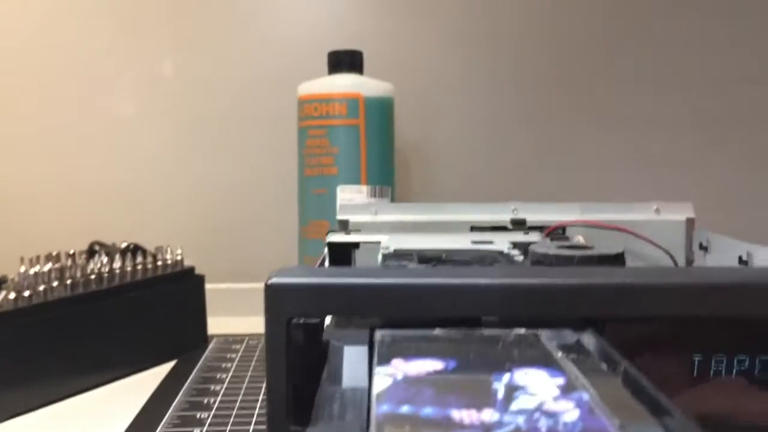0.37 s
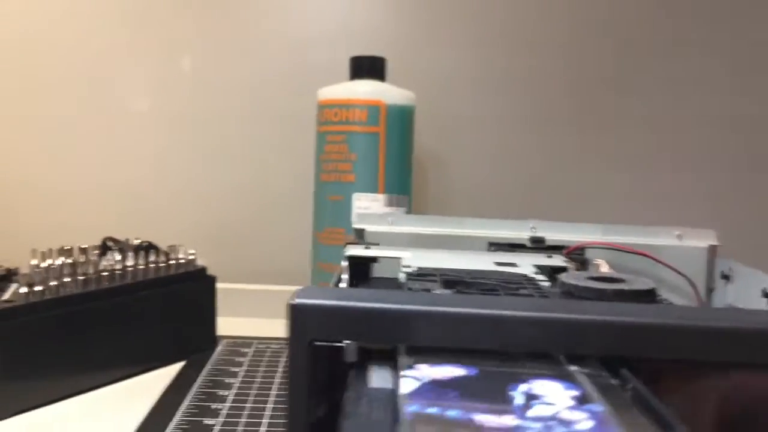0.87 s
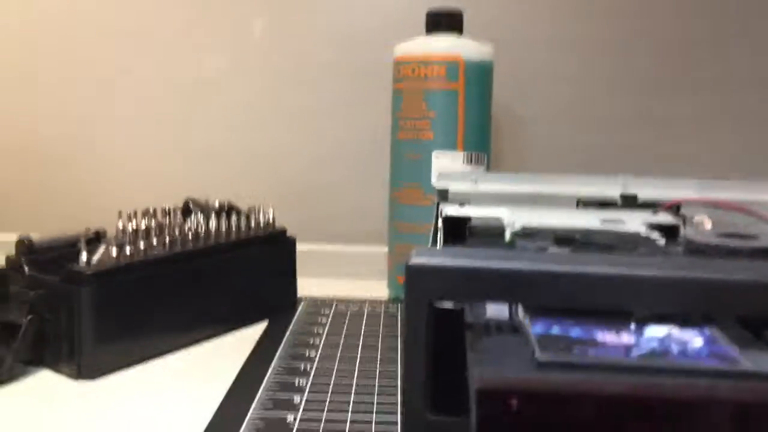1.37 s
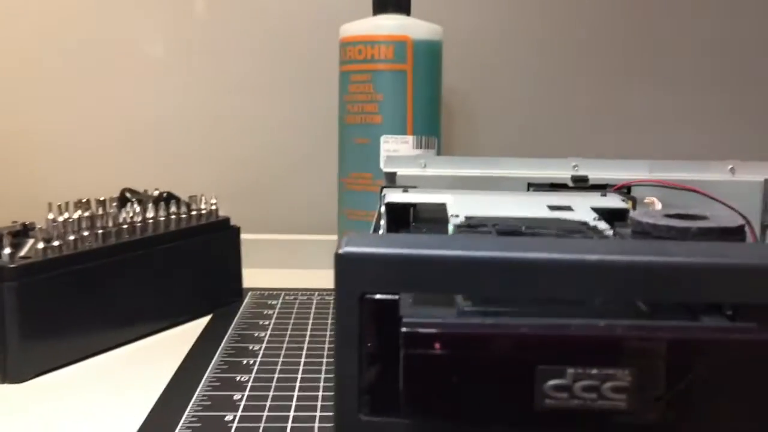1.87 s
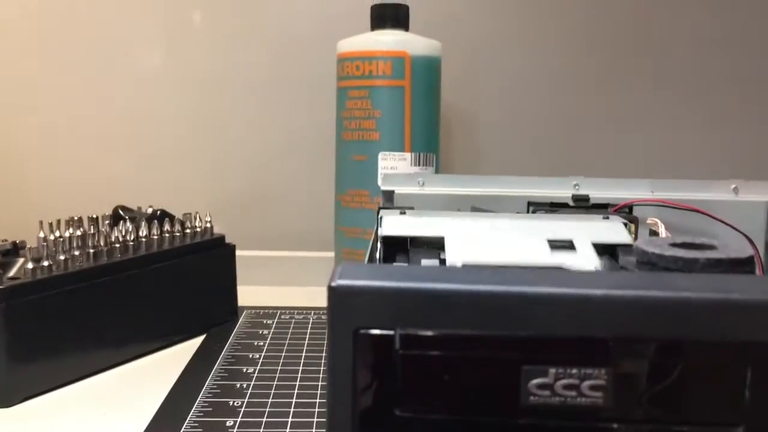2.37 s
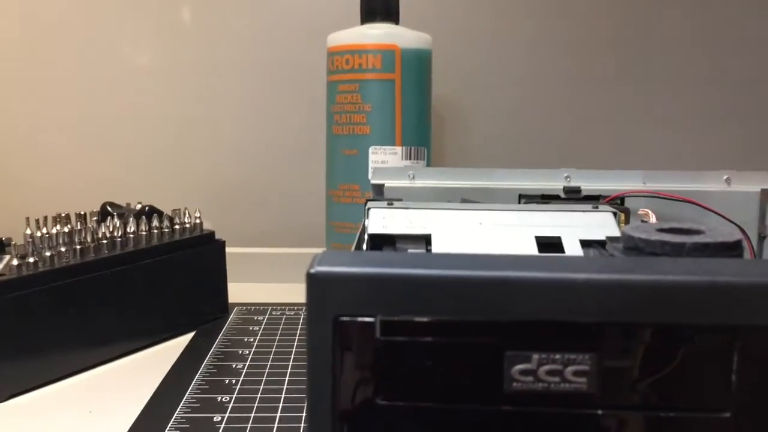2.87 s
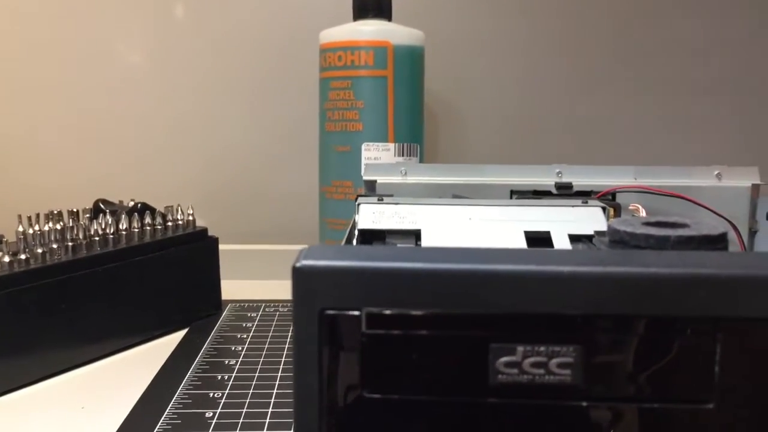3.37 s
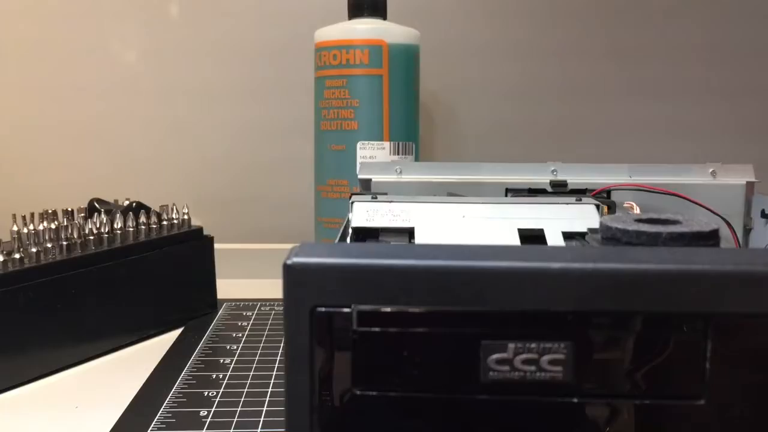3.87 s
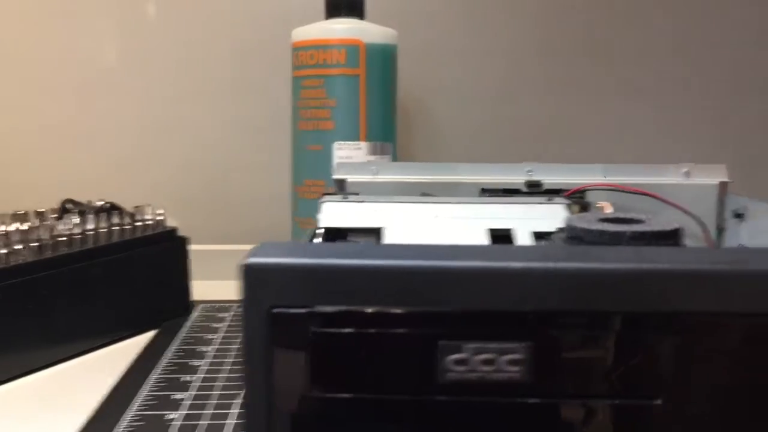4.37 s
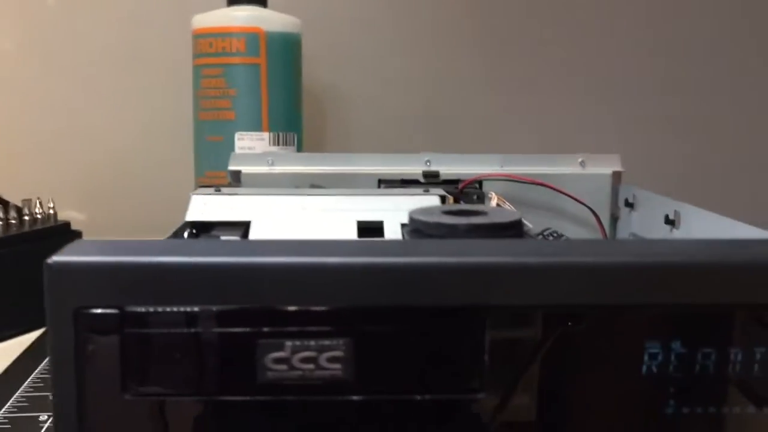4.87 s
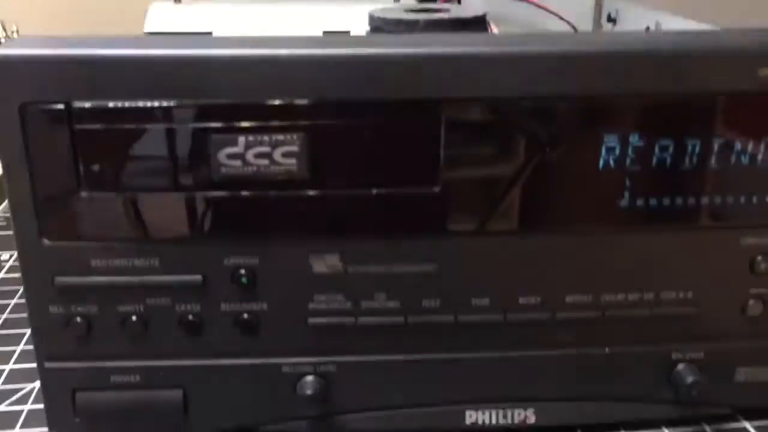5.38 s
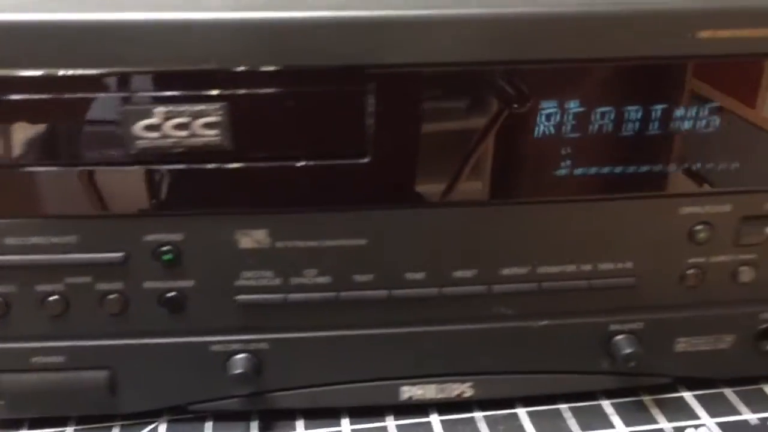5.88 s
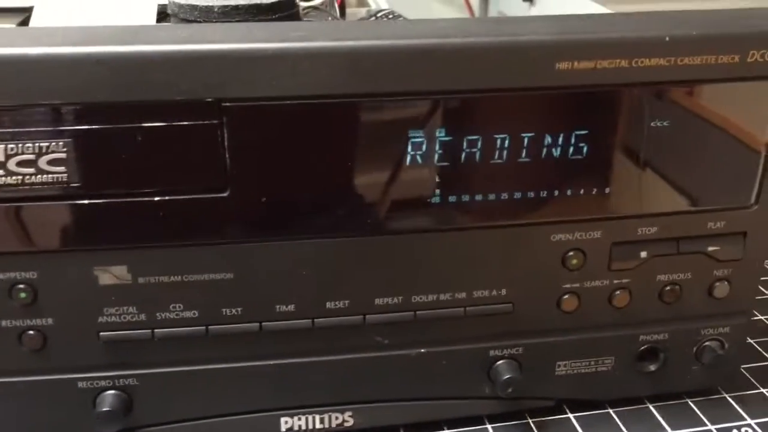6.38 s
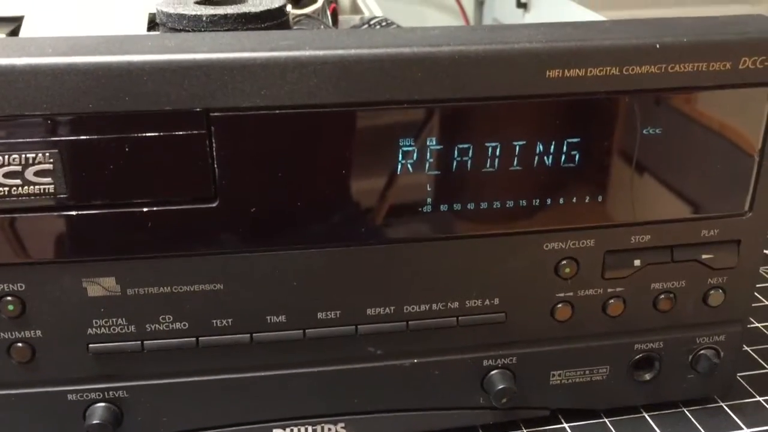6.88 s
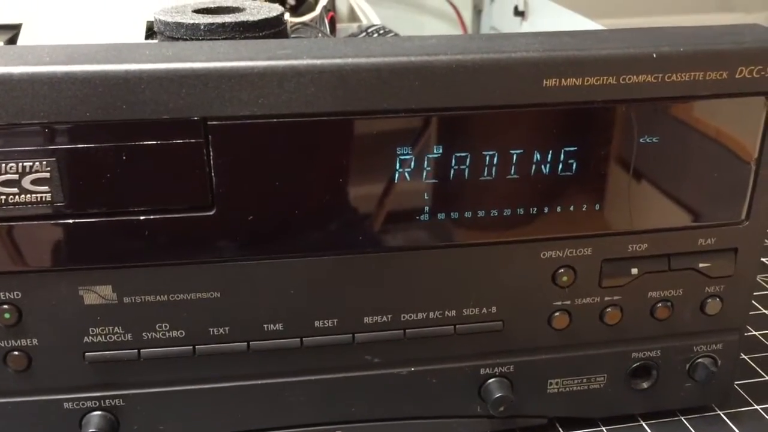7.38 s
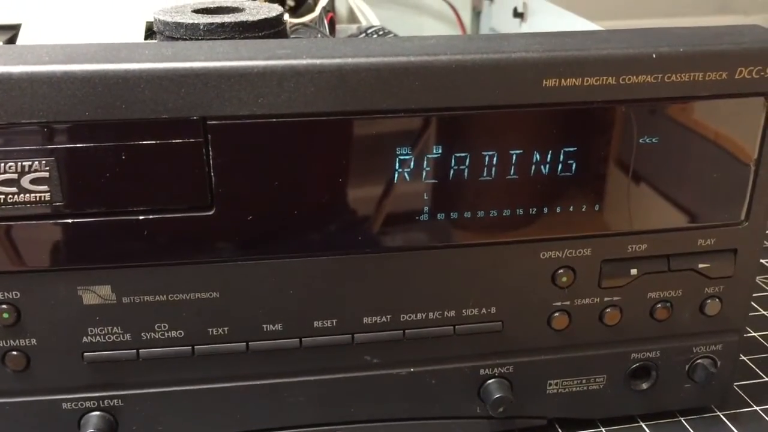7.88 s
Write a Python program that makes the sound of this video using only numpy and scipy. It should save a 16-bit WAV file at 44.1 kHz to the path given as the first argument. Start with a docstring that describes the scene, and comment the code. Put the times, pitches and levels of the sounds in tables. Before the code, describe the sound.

In a quiet room with a low hum, a handheld microphone close to an open cassette deck catches the tray rattling and scraping shut, ending in two hard clunks. A small gear ticks to rest and a light click follows. After a pause, levers clack sharply with gritty gear grinding and a faint motor whine. Another quiet gap, then louder metallic clacks.

```python
"""A quiet room: on a desk stands a cassette deck with its lid off, heard by a hand-held microphone close by.
The tray slides shut and clamps the cassette, as gritty noise through ringing rails; a gear ticks to rest.
Then solenoids and cam levers clack in bursts, as short noise bursts that ring the metal and boom in the case.
The cam gear grinds in between, the motor whines faintly as a stack of tones, and the building hums low.
Small touches: a brush of treble, a shudder as the motor takes up its belt, squeaks before four blows."""
import sys
import numpy as np
from scipy import signal
from scipy.fft import rfft, irfft, next_fast_len
from scipy.io import wavfile
from scipy.ndimage import map_coordinates

SR = 44100
rng = np.random.default_rng(int(sys.argv[2]) if len(sys.argv) > 2 else 0)


def invert_db(level):
    """Linear amplitude ratio for a level in decibels (20 dB per decade), elementwise."""
    return 10 ** (np.asarray(level, dtype=float) / 20)


def waveform_to_disk(signal):
    """Save audio, clipped to [-1, 1], as 16-bit WAV at the path in sys.argv[1]."""
    frames = np.transpose(np.atleast_2d(signal))
    scaled = np.clip(frames, -1, 1) * 32767
    samples = np.round(scaled).astype(np.int16)
    wavfile.write(sys.argv[1], SR, samples)


N = 363384
TIME = np.arange(N) / SR  # seconds

# room modes that color the hum: (center [Hz], width [Hz], level [dB])
ROOM_MODES = [(116.5, 2.9, -6), (129.1, 4.2, -3), (144.3, 6, -5), (172, 20.8, -4), (192.7, 4.8, 2)]
# slow wavering of the hum: (time [s], level [dB])
HUM_LEVEL = [(0, -61.5), (1.2, -61.5), (1.7, -66.5), (2.5, -62), (5.3, -62.5), (6.1, -67.5), (7.4, -61.5),
             (8.24, -60.5)]
# tones in the hum: (pitch [Hz], peak level over the hum's rms [dB])
HUM_TONES = [(119.8, -4.5), (193, -5.5)]
# tone color of the deep rumble: (frequency [Hz], relative level per Hz [dB])
RUMBLE_COLOR = [(13, -74), (22, -42.5), (35, -24.5), (43, -15.5), (86, -14), (110, -6), (140, -33.5),
                (240, -120)]
# moments when the deep rumble swells: (time [s], peak level [dB])
RUMBLE_SWELLS = [(0.64, -61.5), (1.36, -60.5), (1.55, -58.5), (1.97, -58.5), (2.22, -58), (2.59, -55),
                 (5.28, -67), (7.14, -56.5)]
# tone color of air and preamplifier hiss: (frequency [Hz], relative level per Hz [dB])
HISS_COLOR = [(120, -28.5), (205, -4.5), (221, -11), (246, -15.5), (323, -21), (466, -29), (3400, -34),
              (4980, -36.5), (8770, -39), (10500, -41.5), (13100, -39), (14900, -40), (16000, -47)]
# capstan motor tones: (multiple of the shaft rate [-], level before the running curve [dB])
MOTOR_TONES = [(4, -89), (16 / 3, -97), (8, -91), (11, -91), (12, -97), (13, -95), (14, -100), (17, -100),
               (19, -97), (20, -101), (21, -88), (64 / 3, -93), (22, -98), (32, -101), (34, -100),
               (104, -104), (111.2, -101)]
# how the motor runs: (time [s], level change [dB], extra level near the 1 kHz chassis mode [dB])
MOTOR_RUN = [(0, -32.5, 0), (4.5, -18, -5), (4.7, 20, 3), (5.6, 0, -3), (6.3, 0, 1), (7, 2, 2),
             (7.3, -2.5, 9), (8.04, 3.5, 1), (8.1, 7, 10), (8.24, 20, 6)]
# brief soft brush of treble: (start [s], end [s], level [dB])
SWISH_SPAN = (0.055, 0.13, -70.5)
# the motor takes up its belt: (start [s], end [s], level [dB])
SPIN_UP_SPAN = (4.44, 4.46, -72.5)
# motor bracket resonances: (center [Hz], width [Hz], level [dB])
BRACKET_MODES = [(990, 24, 2.5), (1200, 14.7, 1), (1910, 76, -6.5), (3244, 73, -9.5)]
# tray sliding: (time [s], friction [dB], dryness [dB]: positive scrapes, negative rumbles)
TRAY_MOTION = [(0.0, -80, -17), (0.16, -73, -11), (0.31, -72, -23), (0.45, -73.5, -13), (0.56, -67.5, 2),
               (0.71, -55, -4), (0.9, -63.5, -2.5), (1.13, -60, -8), (1.32, -68, 1.5), (1.5, -68.5, 7),
               (1.86, -75, 4.5), (1.96, -65, 16), (2.07, -56, -4), (2.15, -69.5, 4), (2.3, -62.5, -6),
               (2.41, -56.5, -5), (2.55, -54, 6), (2.66, -71, -9), (2.8, -88, 7)]
# resonances of tray and rails: (center [Hz], width [Hz], level [dB])
RAIL_MODES = [(472, 21, -11), (743, 26, -2.5), (932, 42, -6), (1076, 58, -5), (1430, 140, -6),
              (1680, 120, -3), (2210, 120, -11), (2660, 90, -6), (3310, 350, -10.5), (3970, 160, -1.5),
              (4400, 150, -15.5), (12330, 250, -29)]
# rumble, drag, scrape and hiss of the tray: (level over friction [dB], gain per dB of dryness [dB])
SLIDE_LAYERS = [(-6.5, -0.37), (-1, 0), (-6.5, .9), (-17, 1.1)]
# the two turns of the cam gear, each a list of: (time [s], relative level [dB])
CAM_TURNS = [
    [(4.62, -86), (4.752, -51), (4.812, -65), (4.954, -61), (5.068, -70), (5.202, -66.5), (5.348, -85),
     (5.486, -51), (5.62, -105)],
    [(7.55, -84), (7.662, -56), (7.778, -70), (7.804, -47.5), (7.926, -60), (8.24, -104)],
]
# a gear coasting to rest: (time [s], level before the tooth filter [dB])
GEAR_TICKS = [(2.778, -71), (2.834, -74.5), (2.8858, -72.5), (2.9692, -70.5), (3.052, -72.5), (3.1253, -72),
              (3.1906, -68.5), (3.2635, -71), (3.3533, -71), (3.466, -71)]
# a plunger slides before it lands: (start [s], end [s], peak level [dB])
PLUNGER_SQUEAKS = [(4.567, 4.592, -48), (4.923, 4.936, -52), (7.013, 7.032, -54), (7.602, 7.626, -47)]
# the case booms: (time [s], peak level [dB], pitch [Hz], nominal time to fall 60 dB [s])
CASE_THUMPS = [(0.14, -51.5, 440, 0.16), (0.465, -50, 480, 0.17), (0.547, -40.5, 470, 0.029),
               (0.614, -43, 740, 0.092), (1.097, -49, 473, 0.14), (1.15, -48.5, 265, 0.12),
               (1.941, -41, 695, 0.14), (2.207, -28.5, 426, 0.02), (2.212, -35, 230, 0.075),
               (2.243, -51, 450, 0.056), (2.354, -40.5, 435, 0.07), (2.515, -42.5, 680, 0.073),
               (2.55, -37.5, 716, 0.082), (4.583, -42.5, 654, 0.18), (4.723, -51.5, 290, 0.14),
               (4.798, -43, 690, 0.071), (4.987, -51, 330, 0.16), (5.168, -39.5, 467, 0.04),
               (5.38, -45.5, 215, 0.082), (5.45, -40.5, 424, 0.086), (7.034, -40.5, 576, 0.12),
               (7.076, -26.5, 598, 0.046), (7.62, -40, 693, 0.079), (7.837, -42, 463, 0.068),
               (8.199, -40.5, 457, 0.056)]
# lever, latch and solenoid contacts: (time [s], knock level [dB], hardness: clack over knock [dB],
# own ring [Hz], nominal contact time to fall 60 dB [s])
CONTACT_BLOWS = [(0.513, -36, 2.5, 1720, 0.019), (0.587, -44.5, -3, 1300, 0.029),
                 (0.615, -30.5, -2, 1980, 0.033), (0.716, -39.5, -14, 1390, 0.049),
                 (0.74, -46, -13, 870, 0.059), (0.777, -45, -20, 910, 0.021),
                 (0.833, -46.5, -28, 780, 0.091), (0.881, -43, -13, 780, 0.059),
                 (1.264, -54, -10, 783, 0.064), (1.368, -51, -6, 990, 0.029),
                 (1.501, -42.5, -16, 1000, 0.055), (1.853, -49.5, -12, 1780, 0.015),
                 (1.894, -47, -10, 745, 0.031), (1.915, -47, -11, 2370, 0.02),
                 (1.941, -27, -2.5, 1090, 0.031), (2.005, -35, -12, 1030, 0.017),
                 (2.054, -38.5, -7, 1280, 0.033), (2.072, -48, 12.5, 3700, 0.036),
                 (2.086, -36, -15, 990, 0.025), (2.166, -44.5, -19, 1300, 0.027),
                 (2.208, -30, -11.5, 1010, 0.032), (2.245, -43, -4.5, 1500, .02),
                 (2.365, -48, 0, 2500, .015), (2.355, -39, -14, 1080, 0.03), (2.383, -35, -10, 1240, 0.022),
                 (2.402, -31, -5, 1220, .039), (2.421, -32, -7, 1210, 0.028), (2.437, -40, -5, 1500, .02),
                 (2.471, -36.5, -7.5, 1200, 0.087), (2.487, -40, 0, 1720, 0.055),
                 (2.516, -22, -7, 1080, 0.042), (2.551, -19.5, -11, 1707, 0.018),
                 (2.621, -44.5, -5.5, 1200, 0.078), (2.643, -49, -1.5, 2590, 0.033),
                 (2.673, -36, -25, 1340, 0.0088), (2.7, -56, 1, 2600, 0.017),
                 (3.531, -32.5, -5, 1625, 0.041), (3.542, -45, -23, 1500, .012),
                 (3.594, -42, -7, 2250, 0.018), (4.58, -25, -1.5, 2770, 0.058),
                 (4.596, -25.5, 2, 4200, 0.026), (4.61, -26.5, 6, 2770, 0.012),
                 (4.708, -46, -6.5, 1890, .055), (4.724, -29.5, -2, 3640, 0.025),
                 (4.771, -38.5, -2.5, 990, .14), (4.798, -36, 19, 3800, 0.024),
                 (4.939, -35.5, -3, 2670, 0.016), (4.991, -33, -2, 1280, 0.026),
                 (5.002, -38.5, -0.5, 2700, 0.018), (5.081, -48, -12, 2000, .072),
                 (5.157, -37, 11.5, 4480, 0.014), (5.168, -25.5, -30, 1590, 0.014),
                 (5.362, -45, -11, 1130, 0.11), (5.383, -35.5, -5.5, 1305, 0.037),
                 (5.453, -24, -2, 1210, .02), (7.03, -31.5, 4.5, 3870, .1), (7.035, -24, 7.5, 2960, 0.019),
                 (7.062, -22, -0.5, 2940, 0.05), (7.077, -19, 0.5, 2070, 0.044),
                 (7.613, -25.5, -6, 3900, .049), (7.619, -24, 5.5, 2120, 0.013),
                 (7.626, -26, -2, 980, 0.027), (7.745, -42, -3, 1990, 0.082), (7.78, -42, -20, 690, 0.17),
                 (7.831, -30, 8.5, 3670, 0.026), (7.858, -41, 1.5, 950, 0.06), (7.922, -43, 4, 1910, 0.041),
                 (8.112, -50, -6, 1910, 0.058), (8.188, -28, 4.5, 4500, .012),
                 (8.201, -33, -21, 990, 0.039)]
# chassis resonances: (center [Hz], width [Hz], level [dB])
CHASSIS_MODES = [(998, 53, -3), (1340, 120, 0), (2070, 14, -14), (2940, 47, -6), (3220, 270, -25),
                 (3860, 47, -3.5), (4030, 130, -13), (4434, 130, -1.5), (5750, 110, -16), (6070, 126, -2),
                 (6500, 37, -15.5), (7520, 290, -9.5), (9200, 230, -12.5), (10170, 200, -19.5),
                 (13560, 78, -10), (13800, 90, -7.5)]
# sheet metal rattling after a blow: (frequency [Hz], time to fall 60 dB [s])
RATTLE_DECAY = [(200, 0.48), (1000, 0.098), (4000, 0.2), (12000, 0.1)]
# the room after a blow: (frequency [Hz], time to fall 60 dB [s])
ROOM_DECAY = [(200, 0.37), (1000, 0.33), (4000, 0.37), (12000, 0.29)]

RUMBLE_DB, HISS_DB = -72, -71.5
JOLT_RISE_DB_PER_S, JOLT_FALL_DB_PER_S, JOLT_IN_HUM_DB = 148.5, 90, -7
SHAFT_HZ = 90.83
SWISH_RISE_DB_PER_S, SWISH_FALL_DB_PER_S = 800, 220
SPIN_RISE_DB_PER_S, SPIN_FALL_DB_PER_S = 131.5, 133
# top treble over the knock; its gain per dB of hardness, and per halving of the contact time
SNAP_DB, SNAP_GROWS, SNAP_DB_PER_HALVING = -8.5, 1.2, 2
TOP_HZ = 16200


def unit(x):
    """x at rms 1."""
    return x / np.sqrt(np.mean(x ** 2) + 1e-20)


def along(points, hz):
    """Reads (Hz, value) points on a log frequency axis."""
    f, v = np.transpose(points)
    return np.interp(np.log(hz + 1), np.log(f + 1), v)


def curves(rows, **outside):
    """One value per sample for each column after the time."""
    s, *cols = np.transpose(rows)
    return [np.interp(TIME, s, c, **outside) for c in cols]


def wobble(rate):
    """A smooth random curve, rate knots a second."""
    coarse = TIME[::64]
    knots = rng.standard_normal(int(N * rate / SR) + 4)
    return np.interp(TIME, coarse, map_coordinates(knots, [coarse * rate]))


def swell(start, end, db, rise_db, fall_db):
    """A gain that climbs, holds and sinks at steady dB per second."""
    return invert_db(db - rise_db * np.maximum(start - TIME, 0) - fall_db * np.maximum(TIME - end, 0))


def filtered(x, response):
    """x times a complex response of frequency."""
    m = next_fast_len(len(x) + 4096)
    return irfft(rfft(x, m) * response(np.fft.rfftfreq(m, 1 / SR)), m)[:len(x)]


def band(lo_hz, hi_hz):
    """Causal band-pass with steep skirts: third-order slopes on both sides."""
    falling = lambda s: 1 / ((s + 1) * (s * s + s + 1))
    return lambda f: falling(1j * f / hi_hz) * falling(lo_hz / (1j * f + 1e-9))


def body(modes, between_db=-120):
    """Resonances of alternating sign over a flat response."""
    def response(f):
        total = invert_db(between_db)
        for k, (center, width, db) in enumerate(modes):
            peak = 1j * f * width / (center * center - f * f + 1j * f * width)
            total = total + (-1) ** k * invert_db(db) * peak
        return total
    return response


def grit(per_second, spread_db, bed):
    """Scattered slips of uneven size on a bed of noise."""
    size = invert_db(spread_db * np.minimum(rng.exponential(size=N), np.pi))
    slips = (rng.random(N) < per_second / SR) * size
    return unit(unit(slips * rng.standard_normal(N)) + bed * rng.standard_normal(N))


def tails(count):
    """Answers to a blow, one per row: metal rattle, then room; each frequency dies at its own speed."""
    hz, t, z = signal.stft(rng.standard_normal((count, SR * 3 // 10)), SR, nperseg=256)
    rattle, room = (along(decays, hz)[:, None] for decays in (RATTLE_DECAY, ROOM_DECAY))
    # squared gains
    power = invert_db(-11.0 - 120 * t / rattle) / rattle + invert_db(-22.0 - 120 * t / room) / room
    return signal.istft(z * np.sqrt(power * 2 * np.log(1000) / SR), SR, nperseg=256)[1]


def add(out, s, direct, drive, tail):
    """Places a hit and the answer to what drives the structure."""
    sound = signal.fftconvolve(drive, tail)
    sound[:len(direct)] += direct
    out[round(s * SR):][:len(sound)] += sound


def background():
    """Room modes excited by ventilation, a deeper rumble, and the hiss of air and preamplifier."""
    jolts = sum(swell(s, s, db, JOLT_RISE_DB_PER_S, JOLT_FALL_DB_PER_S) for s, db in RUMBLE_SWELLS)
    hum_gain = np.hypot(invert_db(curves(HUM_LEVEL)[0]), invert_db(JOLT_IN_HUM_DB) * jolts)
    rumble_gain = np.hypot(invert_db(RUMBLE_DB + 2.7 * wobble(2.5)), jolts)
    modes = body(ROOM_MODES)
    # steep cuts keep the hum between about 105 and 203 Hz
    hum_color = lambda f: modes(f) / (1 + (f / 203) ** 24) / (1 + (105 / (f + 1)) ** 12)
    hum = filtered(rng.standard_normal(N), hum_color)
    rumble = filtered(rng.standard_normal(N), lambda f: invert_db(along(RUMBLE_COLOR, f)))
    hiss = filtered(rng.standard_normal(N), lambda f: invert_db(along(HISS_COLOR, f)))
    buzz = np.zeros(N)
    for hz, db in HUM_TONES:
        level = invert_db(db + 3.9 * wobble(2.9))
        buzz += level * np.sin(2 * np.pi * hz * TIME + 0.53 * wobble(4.6))
    return hum_gain * (unit(hum) + buzz) + rumble_gain * unit(rumble) + invert_db(HISS_DB) * unit(hiss)


def swish():
    """Soft hiss in the top octaves."""
    hiss = unit(filtered(rng.standard_normal(N), band(2800, 17000)))
    return swell(*SWISH_SPAN, SWISH_RISE_DB_PER_S, SWISH_FALL_DB_PER_S) * hiss


def motor():
    """Multiples of the shaft rate, each unsteady; under load the chassis mode near 1 kHz joins in."""
    run_db, load_db = curves(MOTOR_RUN)
    turns = np.cumsum(SHAFT_HZ * (1 + .0004 * wobble(3.8))) / SR
    tones = np.zeros(N)
    for multiple, db in MOTOR_TONES:
        near_mode = 1 / (1 + ((multiple * SHAFT_HZ - 995) / 45) ** 2)
        level = invert_db(db + near_mode * load_db + 3 * wobble(22))
        cycles = multiple * turns + rng.random() + .08 * wobble(30)
        tones += level * np.sin(2 * np.pi * cycles)
    return np.sqrt(2) * invert_db(run_db) * tones


def spin_up():
    """The starting motor shudders in its bracket: noise through the bracket's resonances."""
    shudder = filtered(rng.standard_normal(N), lambda f: body(BRACKET_MODES)(f) * band(700, 4500)(f))
    return swell(*SPIN_UP_SPAN, SPIN_RISE_DB_PER_S, SPIN_FALL_DB_PER_S) * unit(shudder)


def tray():
    """Plastic slides on rails: as the contact moves along, slips drive now one resonance, now another."""
    slips = grit(1500, spread_db=0.5, bed=1.1)
    rails = invert_db(-14.0) * slips
    for k, (hz, width, db) in enumerate(RAIL_MODES):
        drive = invert_db(db + 5 * wobble(20) * min(1, 2000 / hz))
        ringing = signal.lfilter(*signal.iirpeak(hz, hz / width, SR), slips)
        rails = rails + (-1) ** k * drive * ringing
    flutter_db = 1.1 * wobble(23.72) + 1.5 * wobble(70)  # uneven rails make the friction flutter
    friction_db, dry_db = curves(TRAY_MOTION)
    edges_hz = [220, 650, 2200, 6000, 16500]
    layers = np.zeros(N)
    for (db, grows), lo, hi in zip(SLIDE_LAYERS, edges_hz, edges_hz[1:]):
        layer = unit(filtered(rails, lambda f: np.abs(band(lo, hi)(f))))
        layers += invert_db(db + grows * dry_db) * layer
    moving = TIME < TRAY_MOTION[-1][0]
    return moving * invert_db(friction_db + flutter_db) * layers


def cam():
    """The cam gear grinds through the chassis between the clacks."""
    level = sum(invert_db(curves(turn, left=-140, right=-140)[0]) for turn in CAM_TURNS)
    chassis = body(CHASSIS_MODES, between_db=-22.5)
    slips = grit(660, spread_db=-6.0, bed=1.0)
    grind = filtered(slips, lambda f: chassis(f) * band(400, 9000)(f))
    return level * invert_db(1.3 * wobble(40) - 4.0) * unit(grind)


def ticks():
    """A plastic tooth slips past a pawl, more slowly toward the end: tiny noise bursts that ring."""
    slips = np.zeros(N)
    t = np.arange(SR // 50) / SR
    for s, db in GEAR_TICKS:
        slips[round(s * SR):][:len(t)] += invert_db(db - 60 * t / 0.069) * rng.standard_normal(len(t))
    return invert_db(13.5) * filtered(slips, body([(1590, 260, 1), (2180, 800, -14)]))


def squeaks():
    """A brief swelling note, rough in pitch, just ahead of the solenoid's blow."""
    level = np.zeros(N)
    for start, end, db in PLUNGER_SQUEAKS:
        level += invert_db(db) * np.interp(TIME, [start, end, end + 0.0025], [0, 1, 0])
    return level * np.sin(2 * np.pi * 2720 * TIME + 1.3 * wobble(330))


def thumps():
    """Heavier blows boom in the hollow case: a short push of noise rings one low resonance."""
    out, t = np.zeros(N + SR), np.arange(SR // 8) / SR
    for (s, db, hz, t60), tail in zip(CASE_THUMPS, tails(count=len(CASE_THUMPS))):
        life = max(t60, .01)
        push = rng.standard_normal(len(t)) * invert_db(-60 * t / life) * (1 - np.exp(-t / (0.051 * life)))
        case = body([(hz, 70, 0)], between_db=-6)
        boom = filtered(push, lambda f: band(170, 750)(f) * case(f))
        energy = invert_db(db - 5.5) * np.sqrt(life * SR / np.log(1000))
        boom = energy * boom / np.linalg.norm(boom)
        add(out, s, boom, boom, tail)
    return out[:N]


def contacts():
    """Each contact is a short rough burst that rings its lever and the chassis; its treble is over sooner."""
    out, size = np.zeros(N + SR), 8192
    t, f = np.arange(size) / SR, np.fft.rfftfreq(size, 1 / SR)
    chassis = body(CHASSIS_MODES, between_db=-12)(f)
    # the lingering rattle has so many modes that few stand out
    panels = body(CHASSIS_MODES, between_db=-5)(f)
    clack = band(2400, 6000)(f)
    snap = band(6000, 21000)(f) * (f / 9000) ** 0.47
    lasting = np.array([[1.1], [.9], [.6]])  # for knock, clack and snap
    for (s, db, clack_db, ring_hz, t60), tail in zip(CONTACT_BLOWS, tails(count=len(CONTACT_BLOWS))):
        contact_s = max(t60, .005)
        knock = band(np.clip(.7 * ring_hz, 620, 1200), 2400)(f)  # small levers knock higher
        snap_db = SNAP_DB + SNAP_GROWS * clack_db - SNAP_DB_PER_HALVING * np.log2(contact_s / .03)
        life = lasting * contact_s
        onset = 1 - np.exp(-t / (life * (.015 + .6 * life)))  # long contacts start softly
        noise = rng.standard_normal((3, size)) * invert_db(-60 * t / life) * onset
        burst = rfft(noise) * np.array([knock, clack, snap])
        lever = body([(ring_hz, .1 * ring_hz, -3)])(f)
        direct = irfft(burst * (chassis + lever))[:, :size // 2]
        drive = irfft(burst * (panels + .6 * lever))[:, :size // 2]
        # energy of a burst = squared peak times its length; this is its square root
        peaks = invert_db(np.array([db, db + clack_db, db + snap_db]) - 7)
        energy = peaks * np.sqrt(life[:, 0] * SR / np.log(1000))
        # bending waves pass energy between ranges
        spread = np.hypot(energy, [0.52 * energy[1], 0.097 * energy[0], 0])
        hit = energy / np.linalg.norm(direct, axis=1) @ direct
        shake = spread / np.linalg.norm(drive, axis=1) @ drive
        add(out, s, hit, shake, tail)
    return out[:N]


def scene():
    """Everything heard at one microphone."""
    blows = contacts() + thumps() + squeaks() + ticks()
    motion = tray() + cam() + spin_up() + motor()
    return (blows + motion + swish() + background())[None]


def top_cut(x):
    """Nothing passes above the cut-off."""
    return signal.sosfilt(signal.butter(12, 16990, fs=SR, output="sos"), x)


def record(dry):
    """A small microphone loses the deepest bass; the highest treble is cut to a faint trace."""
    treble_cut = lambda f: np.clip((TOP_HZ - f) / 400, .03, 1)
    bass_loss = lambda f: 1 / (1 + (33 / (f + 1)) ** 5)
    heard = filtered(dry[0], lambda f: treble_cut(f) * bass_loss(f))
    return top_cut(heard[None])


dry = scene()
out = record(dry)
waveform_to_disk(out)
```